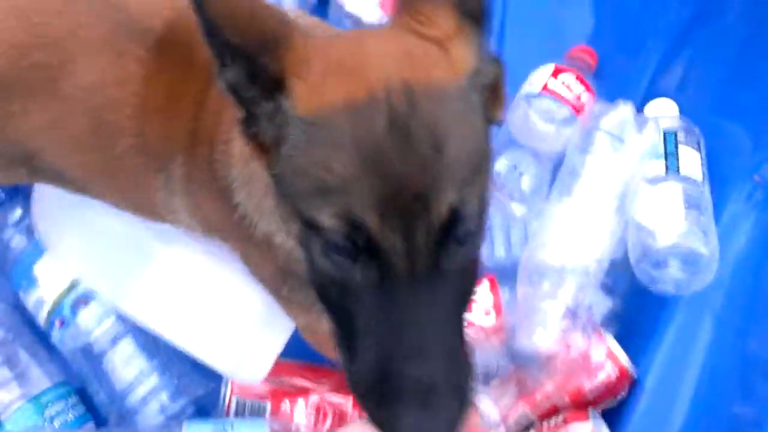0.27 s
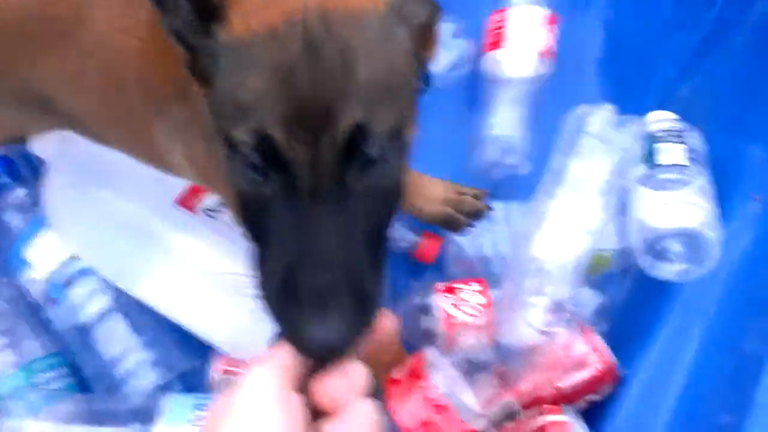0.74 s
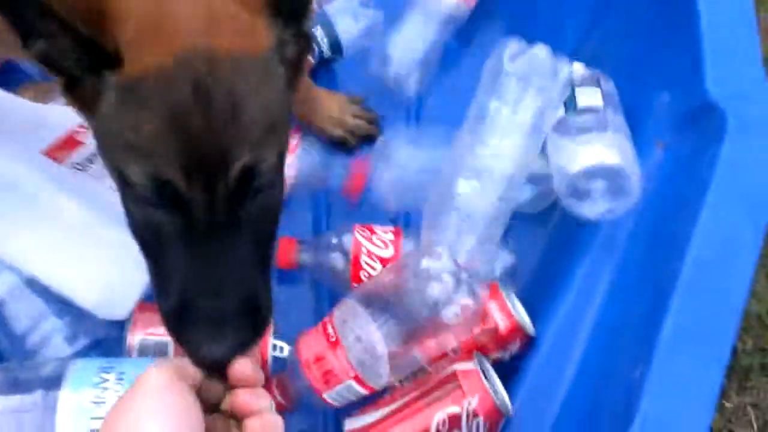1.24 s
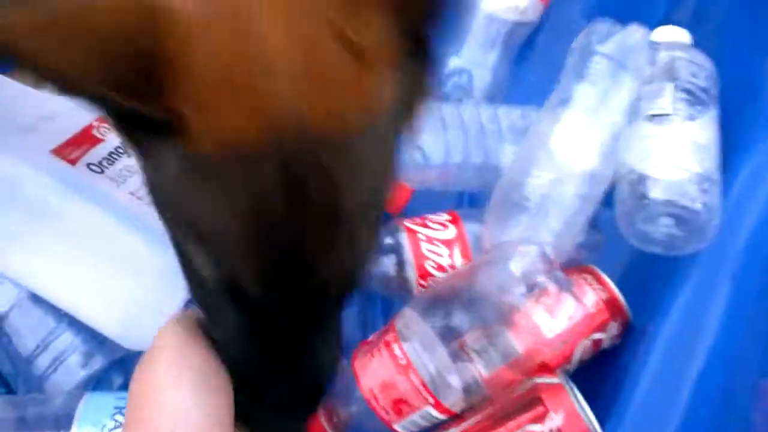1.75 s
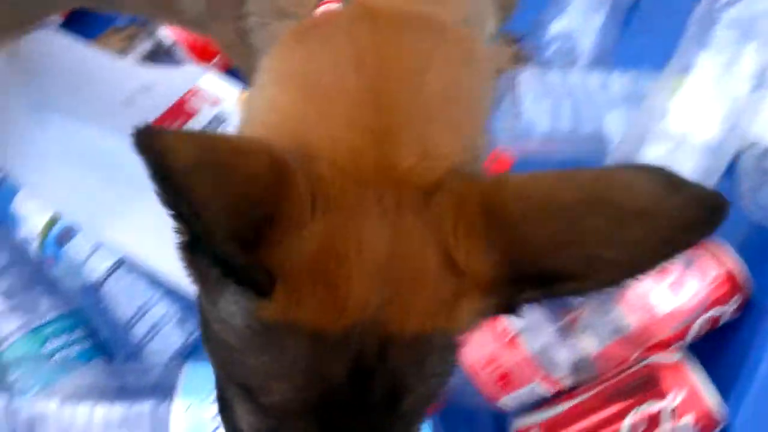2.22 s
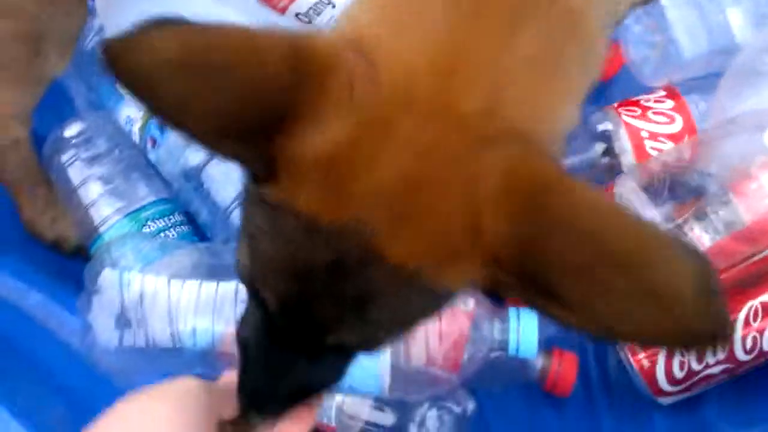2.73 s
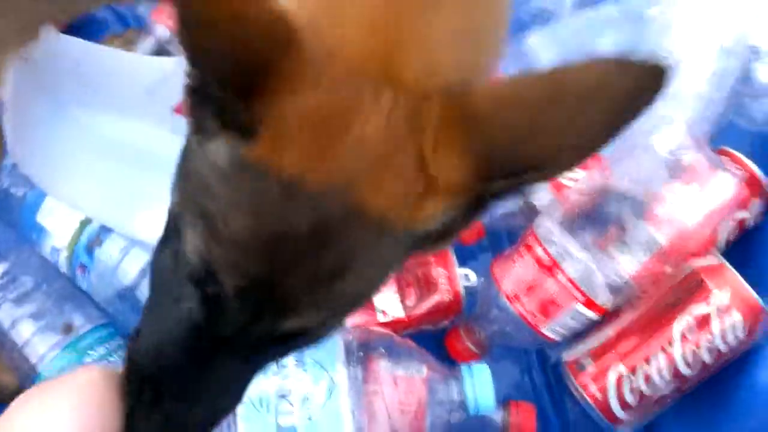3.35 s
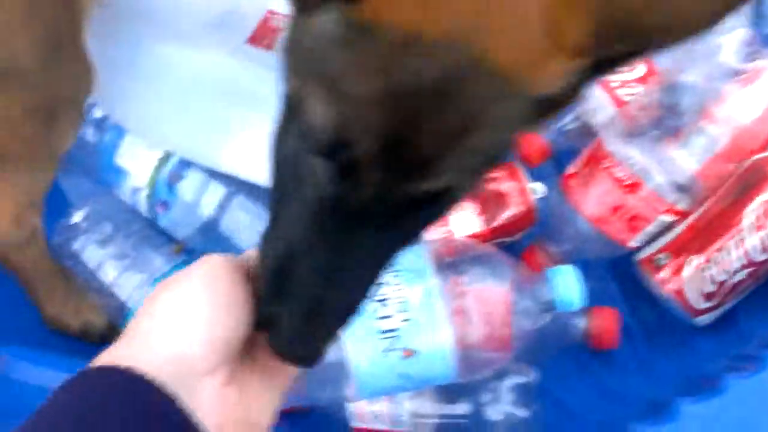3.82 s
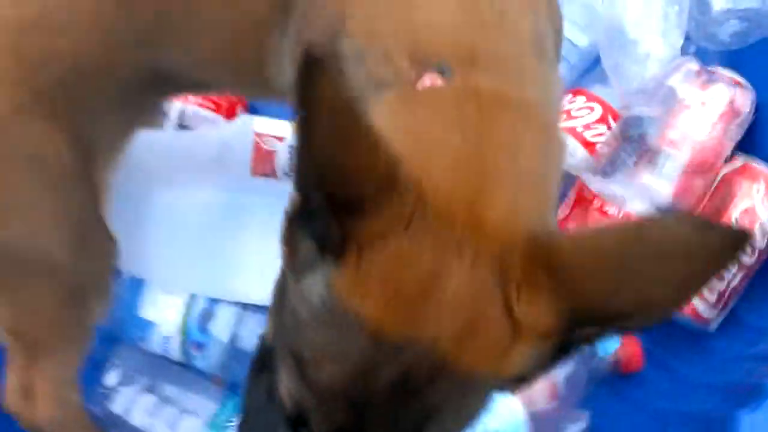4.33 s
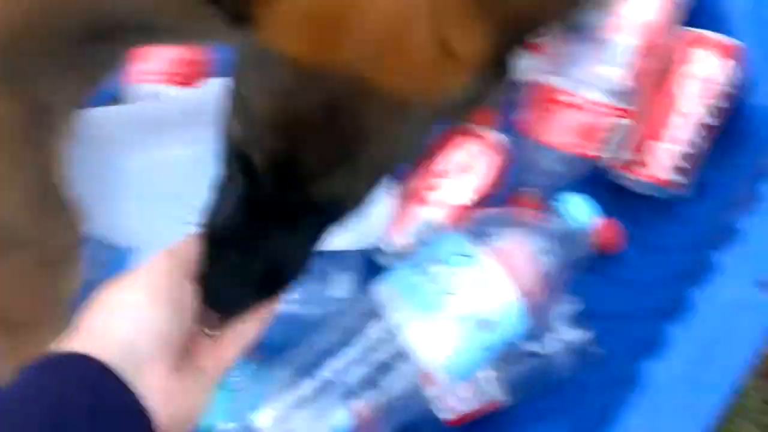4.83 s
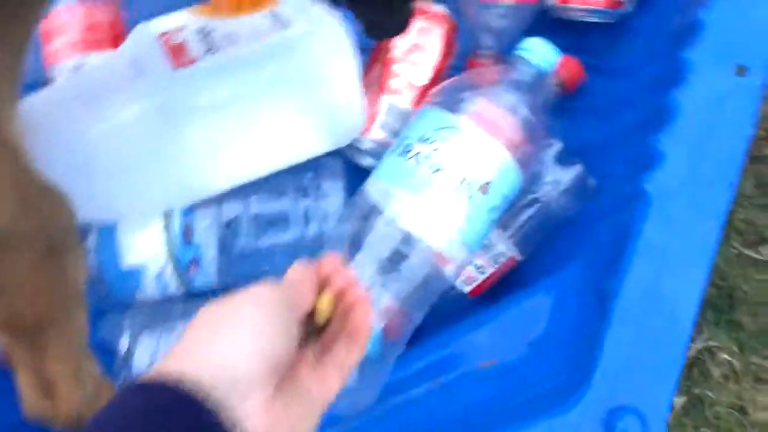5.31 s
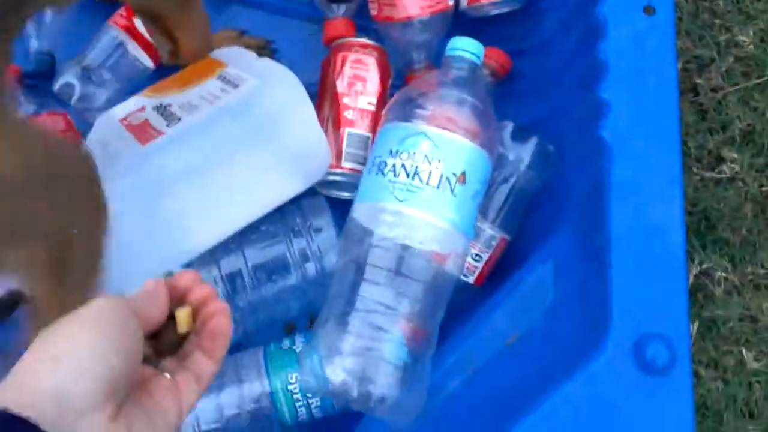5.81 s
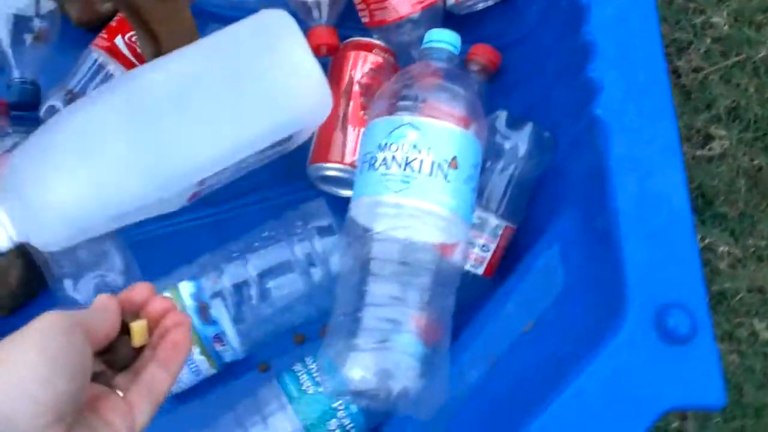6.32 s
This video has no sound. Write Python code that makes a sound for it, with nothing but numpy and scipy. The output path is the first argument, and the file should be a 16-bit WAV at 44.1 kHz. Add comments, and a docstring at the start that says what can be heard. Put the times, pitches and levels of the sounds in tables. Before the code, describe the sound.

A dog rummages through light empty bottles and cans, hollow knocks, tinny clatter and sharp plastic crinkles coming close and dry in uneven flurries.

```python
"""Empty plastic bottles and cans, stirred by a dog's paws and nose in a plastic pool, on a phone close by.
Bottles knock as damped hollow modes, cans tok near 1.2 kHz with a buzz, thin walls crack in noise bursts.
Random contacts through resonances make the sliding heap: low rattle, can chatter, high rustle and crinkle.
Rubs, one squeak, soft brushing and quiet outdoor air lie underneath; short pool reflections widen it all."""
import sys
import numpy as np
from scipy import signal
from scipy.fft import rfft, irfft
from scipy.io import wavfile
from scipy.ndimage import uniform_filter1d, minimum_filter1d

SR = 44100
rng = np.random.default_rng(int(sys.argv[2]) if len(sys.argv) > 2 else 0)


def put_to_file(sound):
    """Save the sound as 16-bit audio at rate SR, in the file named by the first command-line argument."""
    columns = np.atleast_2d(sound).T  # one column per channel
    safe = np.clip(columns, -1, 1)
    whole_steps = np.round(safe * 32767)
    wavfile.write(sys.argv[1], SR, whole_steps.astype(np.int16))


N = 289296  # samples

# Source levels are set ahead of the pool reflections and the microphone.
# Quiet outdoor air, spectral shape: pitch_hz [Hz], relative_db [dB]
AIR_COLOUR = [(12, -32.5), (20, -2), (27, -20), (85, -7.5), (134, -5.5), (153, -8), (487, -16), (1730, -31),
              (9360, -33), (11000, -36)]
AIR_DB = -60.5
# Soft even rustle, probably fur and nose brushing plastic: time_s [s], level_db [dB]
BRUSH_LEVEL = [(0, -53), (.85, -52.5), (1.0, -51.5), (1.07, -70), (1.15, -44), (1.851, -56), (1.949, -69.5),
               (2.63, -87), (2.72, -64.5), (3.05, -48), (3.33, -47.5), (3.9, -54), (4.2, -62), (4.6, -52.5),
               (4.75, -61), (5.3, -66), (5.43, -64), (5.619, -54.5), (5.75, -59.5), (6.101, -63),
               (6.56, -56.5)]
# Resonances of the brushed plastic: pitch_hz [Hz], width_hz [Hz, one filter pass], relative_db [dB]
BRUSH_COLOUR = [(348.4, 510, -2.5), (1200, 750, 2), (4574, 3200, -5), (7000, 4500, 0), (9550, 1400, -7.5)]
SQUEAK_S, SQUEAK_DB, SQUEAK_HALF_S = 5.279, -29, 0.0035  # middle, level, time from middle to 1/e
SQUEAK_HZ, SQUEAK_DROP_HZ, SQUEAK_SETTLE_S = 3750, 900, 0.0039  # resting pitch, fall on to it, its pace
# Rubs that make one resonance sing:
# middle_s [s], level_db [dB], pitch_hz [Hz], width_hz [Hz, one filter pass], half_s [s to 1/e]
RUBS = [(0.008, -22, 940, 81, 0.079), (0.126, -35, 877, 80, 0.076), (0.264, -24.5, 301, 48.7, 0.067),
        (3.879, -39.5, 1188, 99.3, 0.025), (4.015, -42.5, 4540, 1690, 0.021),
        (4.327, -47, 237, 60.5, 0.069), (6.464, -25.5, 219.4, 58.2, 0.024)]
# Shoves of paw or nose that set the heap sliding:
# start_s [s], length_s [s], rattle_db [dB], chatter_db [dB], rustle_db [dB]
SHOVES = [(0, 0.12, -21, -26, -40), (0.135, 0.22, -27.5, -28, -38), (0.396, 0.087, -30.5, -39.5, -49.5),
          (0.506, 0.055, -26, -27.5, -40.5), (0.607, .19, -21.5, -34, -42.5),
          (0.918, 0.069, -30, -36.5, -48), (1.013, 0.01, -27, -64, -59), (1.104, 0.034, -32, -27, -57),
          (1.172, 0.098, -25.5, -29.5, -39.5), (1.301, 0.18, -18.5, -22.5, -34),
          (1.498, 0.15, -19.5, -22.5, -36.5), (1.63, 0.085, -24, -33, -61), (1.749, 0.026, -23, -48, -55),
          (1.849, 0.046, -36.5, -68.5, -61), (2.256, 0.015, -48.5, -60.5, -69.5),
          (2.392, 0.043, -61.5, -79.5, -87.5), (2.707, 0.21, -23.5, -38, -45),
          (2.959, 0.06, -22.5, -37, -43.5), (3.096, 0.03, -28.5, -27.5, -61),
          (3.153, 0.06, -34.5, -33, -45), (3.25, 0.021, -30.5, -25, -45), (3.414, 0.19, -24, -28.5, -41.5),
          (3.648, 0.12, -31.5, -39.5, -47), (3.833, 0.063, -46.5, -47.5, -45.5),
          (4.004, 0.051, -60.5, -57, -47.5), (4.294, 0.063, -46.5, -54, -59.5),
          (4.404, 0.067, -56, -51.5, -62.5), (4.557, 0.045, -53, -59, -56), (4.783, 0.058, -59, -57, -58),
          (4.894, 0.036, -55, -38.5, -52), (4.97, 0.079, -29.5, -30.5, -45), (5.086, 0.19, -26.5, -36, -35),
          (5.352, 0.034, -42, -66, -59.5), (5.44, 0.12, -54, -70, -69), (5.842, 0.059, -29, -34, -42),
          (5.923, 0.021, -21, -56, -56), (6.013, 0.012, -39, -69, -78), (6.17, 0.027, -34, -37, -41.5),
          (6.203, 0.14, -27.5, -31.5, -37), (6.388, 0.099, -30.5, -39.5, -40), (6.542, .03, -27, -50, -39)]
# How a shove swells, runs down while it lasts and dies after; rows are rattle, chatter, rustle:
# rise [dB/s], sag [dB/s], fall [dB/s]
MOTION = [(900, 34, 558.5), (1506, 54, 543), (411.4, 37, 298.5)]
RATTLE, CHATTER, RUSTLE = 0, 1, 2  # rows of MOTION
# Resonances of shaken bottles, cans and thin walls:
# pitch_hz [Hz], width_hz [Hz, one filter pass], relative_db [dB]
HOLLOW = [(210.5, 150, 3), (301, 130, 5.5), (445.3, 394, 0)]
CANS = [(774, 335, 7), (1340, 380, -3.5), (1804, 340, -5.5), (3172, 2700, -19.5)]
WALLS = [(2780, 550, -13), (4470, 2420, 0.5), (5654, 2600, 3), (6990, 3660, 0.5), (10140, 840, -7)]
# Wall cracks: start_s [s], level_db [dB], pitch_hz [Hz, centre], low_db [dB, low part against level]
CRACKS = [(0.032, -30, 6000, -9), (0.124, -21, 6200, -6), (0.3014, -24.5, 6330, -11),
          (0.5094, -21, 5370, -7.5), (0.5487, -20, 6360, -4.5), (0.5886, -29, 3660, 8.5),
          (0.6633, -25.5, 6440, -41), (0.6816, -22.5, 6500, -20), (0.962, -21.5, 5540, 0.5),
          (1.0983, 0, 5080, -11), (1.1403, -17.5, 4200, -10), (1.28, -1, 5490, -8.5),
          (1.2934, -23.5, 6150, -37.5), (1.3068, 4, 6980, -7), (1.353, -21, 4450, -7),
          (1.4154, -19.5, 5250, -20.5), (1.4632, -30.5, 3950, -10.5), (1.493, -22, 5670, -4),
          (1.5524, -18.5, 4850, -5), (1.622, -21.5, 4960, -1), (1.754, -34, 4500, -8),
          (2.6854, -28, 5380, -4), (2.708, -28, 5320, -7), (2.7997, -25, 6170, -14), (2.9219, -26, 6110, 5),
          (2.965, -18.5, 6770, -15), (3.0037, -25, 5470, -29), (3.101, -26.5, 3810, -1.5),
          (3.1443, -20.5, 6120, -15), (3.1588, -22.5, 3940, 6), (3.243, -20.5, 4660, -12),
          (3.3617, -30, 5000, 7), (3.404, -38, 4300, 6), (3.4185, -23.5, 5000, 2), (3.457, -28.5, 4960, 6),
          (3.582, -25.5, 6100, -25), (4.892, -30, 7100, -23), (4.961, -23, 6020, -28),
          (4.9806, -12, 5130, 0), (4.987, -30, 4100, -23), (4.996, -19.5, 5450, -23),
          (5.062, -27.5, 6150, 2), (5.1073, -26.5, 6500, 6), (5.141, -26, 4320, 2),
          (5.683, -32.5, 4840, 2.5), (5.8902, -26.5, 3800, 0), (5.938, -33.5, 4070, -2),
          (6.148, -14, 3930, -3), (6.2612, -24, 5770, 4.5), (6.528, -18, 4270, -8)]
# Can toks: start_s [s], level_db [dB], pitch_hz [Hz]
TOKS = [(0.9613, -15, 1186), (1.0225, -33, 1190), (1.1002, -13, 1466), (1.242, -16, 878),
        (1.2805, -13, 1096), (1.356, -21, 1212), (1.36, -1.5, 1170), (1.372, -29, 1288),
        (1.3918, -30, 1147), (1.4025, -9.5, 1157), (1.416, -2, 1206), (1.4338, -14, 1197),
        (1.465, -0.5, 1178), (2.2548, -33.5, 1188), (2.7303, -11.5, 1246), (2.9648, -25.5, 1340),
        (3.0144, -9, 1178), (3.1049, -6.5, 1230), (3.161, -17, 1028), (3.245, -17, 1245),
        (3.267, -32, 1255), (3.332, -33, 1150), (3.361, -10, 1140), (3.406, -7, 1207), (3.4541, -9.5, 1220),
        (3.511, -13, 1155), (3.5372, -16, 1160), (3.584, -26, 1170), (3.7694, -36, 1170),
        (4.342, -39.5, 1180), (4.407, -41, 1443), (4.924, -28, 1475), (4.961, -26, 970),
        (4.9819, -16, 1007), (5.104, -19.5, 1070), (5.1363, -22, 1280), (5.1716, -17.5, 1170),
        (5.285, -33, 1280), (5.893, -19, 1250),]
CLEAN_TOK_DB = -17  # harder toks ring clear, softer ones mostly buzz
# Bottle knocks: start_s [s], level_db [dB], pitch_hz [Hz], upper_db [dB, clunk against level]
KNOCKS = [(0.094, -17, 447, -8), (0.18, -20.5, 247.8, -17), (0.214, -17, 296.4, -20),
          (0.25, -9.5, 294, -42), (0.315, -19.5, 287, -14), (0.344, -19.5, 303, -20.5),
          (0.417, -20.5, 207.6, -10), (0.508, -20.5, 228.5, -21), (0.51, -15, 510, -24),
          (0.589, -4, 339, -16.5), (0.72, -17.5, 338, -8.5), (0.764, -11, 278.6, -23),
          (0.92, -23.5, 260, -31), (1.022, -18.5, 266.6, -4), (1.096, -17, 653, 0),
          (1.175, -16.5, 301, -0.5), (1.232, -20.5, 191.1, -12), (1.303, -12.5, 447.5, -21),
          (1.312, -1, 336.4, -9), (1.361, -9, 323.3, -23), (1.499, -16, 303, -19), (1.625, -16, 723, -34),
          (1.678, -21, 244.4, -17), (1.733, -15, 465.5, -19), (1.753, -18.5, 732, -13),
          (1.828, -28, 361, -16), (1.861, -24.5, 281.8, -32), (2.651, -36.5, 446, -22),
          (2.685, -15.5, 810, -14.5), (2.721, -30, 302, -28), (2.76, -22, 242, -1),
          (2.917, -8, 333.5, -7.5), (2.982, -14.5, 350, -11), (3.074, -17.5, 267.4, -11.5),
          (3.198, -14.5, 266, -15), (3.245, -23, 716, -13), (3.38, -17.5, 221, -5.5),
          (3.4175, -12, 293, -6), (3.49, -18.5, 760, -8), (3.564, -21.5, 169.8, -9),
          (3.648, -17.5, 261, -15), (3.705, -24, 353, -18.5), (5.062, -14, 268, -6),
          (5.097, -9.5, 391, -16.5), (5.106, -29.5, 364, -16), (5.148, -15, 356, -16),
          (5.175, -14.5, 275.5, -30), (5.24, -20, 350, -12), (5.683, -17, 349, -9), (5.856, -26.5, 298, -6),
          (5.891, -16, 280, -11.5), (5.9369, -20.5, 343, 0.5), (5.97, -21.5, 294, -27),
          (6.0144, -34, 298, 6.5), (6.213, -18, 790, -5.5), (6.223, -16.5, 281, -6.5),
          (6.278, -16.5, 375, -8.5), (6.308, -22, 687, -11), (6.333, -27.5, 396, -15),
          (6.394, -20.5, 199, -31), (6.406, -26, 720, -2.5), (6.44, -15, 416, -23),
          (6.529, -9.5, 268, -23.5)]
# Ringing modes of a bottle: ratio [multiple of pitch_hz], relative_db [dB], t60_s [s, for a 300 Hz bottle]
BOTTLE_MODES = [(1, -2, 0.046), (1.4, -13, 0.057), (.7, -21, 0.1)]
# Upper resonances in the clunk: pitch_hz [Hz], width_hz [Hz, one filter pass], relative_db [dB]
BOTTLE_UPPER = [(743, 440, 10.5), (1273, 560, 1.5), (2022, 110, -11.5)]
# Likeness of the two microphone ports: pitch_hz [Hz], correlation [0 to 1]
LIKENESS = [(30, 0.35), (150, 1), (1000, 0.88), (2500, 0.39), (9000, 0.54)]
# Lean to the left port: pitch_hz [Hz], share [ratio, negative leans right]
LEFT_LEAN = [(1000, 0.045), (2500, -0.12), (5000, 0.25)]
MIC_DB, LIMIT, TOP_HZ = -1.88, 0.98, 10700  # gain, peak ceiling ahead of the top cut, top cut


def undb(db):
    """Decibels to an amplitude factor."""
    return 10 ** (np.asarray(db) / 20)


def unit(x):
    """Scale to an RMS of 1."""
    return x / np.sqrt(np.mean(x ** 2))


def by_hz(table, hz):
    """Read a (pitch_hz, value) table on a log-frequency axis."""
    pitch_hz, value = np.transpose(table)
    return np.interp(np.log(hz + 1), np.log(pitch_hz), value)


def band(x, hz, width_hz):
    """A resonance applied twice."""
    b, a = signal.iirpeak(min(hz, 0.45 * SR), hz / width_hz, fs=SR)
    once = signal.lfilter(b, a, x)
    return signal.lfilter(b, a, once)


def body(x, peaks):
    """Resonances of a body driven by x, in alternating polarity."""
    total = 0
    for k, (hz, width_hz, db) in enumerate(peaks):
        total = total + (-1) ** k * undb(db) * band(x, hz, width_hz)
    return unit(total)


def ring(hz, t60_s, rise_s):
    """One damped mode, pushed up over the contact time; peak 1."""
    t = np.arange(int(0.09 * SR)) / SR
    mode = np.sin(2 * np.pi * hz * t) * (1 - np.exp(-t / rise_s)) * undb(-60 * t / t60_s)
    return mode / np.abs(mode).max()


def add(track, start_s, sound):
    """Mix a short sound in at its start time."""
    i = int(start_s * SR)
    track[i:i + len(sound)] += sound[:N - i]


def contacts(rate_hz, scatter_db, rub, soft_s):
    """Random small contacts of uneven size, each a short scrape, over a steady rub."""
    hits = (rng.random(N) < rate_hz / SR) * undb(scatter_db * rng.standard_normal(N))
    keep = np.exp(-1 / (soft_s * SR))
    scrapes = unit(signal.lfilter([1], [1, -keep], hits))
    return unit((scrapes + rub) * rng.standard_normal(N))


def air():
    """Quiet outdoor background: steady noise shaped by its spectrum."""
    hz = np.fft.rfftfreq(N, 1 / SR)
    spectrum = rfft(rng.standard_normal(N)) * undb(by_hz(AIR_COLOUR, hz))
    return undb(AIR_DB) * unit(irfft(spectrum, N))


def brushing():
    """Fine friction noise with a few faint ticks in it."""
    level_db = np.interp(np.arange(N) / SR, *np.transpose(BRUSH_LEVEL))
    return undb(level_db) * body(contacts(60.0, 4.0, 1.5, 0.004), BRUSH_COLOUR)


def squeak():
    """Two walls slip past each other with a short falling chirp."""
    t = np.arange(N) / SR - SQUEAK_S
    since_onset = np.maximum(t + SQUEAK_HALF_S, 0)
    hz = SQUEAK_HZ + SQUEAK_DROP_HZ * np.exp(-since_onset / SQUEAK_SETTLE_S)
    swell = np.exp(-(t / SQUEAK_HALF_S) ** 2)
    return undb(SQUEAK_DB) * swell * np.sin(2 * np.pi * np.cumsum(hz) / SR)


def rubs():
    """Friction noise through one narrow resonance, swelling and fading."""
    out, t = np.zeros(N), np.arange(N) / SR
    noise = rng.standard_normal(N)
    for middle_s, db, hz, width_hz, half_s in RUBS:
        swell = np.exp(-((t - middle_s) / half_s) ** 2)
        out += undb(db) * swell * unit(band(noise, hz, width_hz))
    return out


def shaking(layer):
    """How hard one kind of body is shaken: the powers of all shoves add."""
    t = np.arange(0, N, 32) / SR  # a coarse time grid is enough
    rise, sag, fall = MOTION[layer]
    power = 0
    for start_s, length_s, *db in SHOVES:
        before = rise * np.maximum(start_s - t, 0)
        during = sag * np.clip(t - start_s, 0, length_s)
        after = fall * np.maximum(t - start_s - length_s, 0)
        power = power + undb(db[layer] - (before + during + after)) ** 2
    return np.interp(np.arange(N) / SR, t, np.sqrt(power))


def crinkle():
    """Small wall panels of many sizes, each popping now and then on its own pitch."""
    total = 0
    for hz in 3600.0 * 2.3 ** rng.random(12):
        total = total + unit(band(contacts(40.0, 3.0, 0.2, 0.0044), hz, hz / 12.0))
    return unit(total)


def sliding():
    """The moving heap: three kinds of body, partly shaken by the same bumps; the thin walls also crinkle."""
    bumps = contacts(200.0, 1.8, 0.27, 0.0061)
    can_bumps = 0.37 * bumps + contacts(320.0, 2.7, 0.081, 0.0033)
    wall_bumps = 0.35 * bumps + contacts(160.0, 1.1, 0.98, 0.0037)
    rattle = shaking(RATTLE) * body(bumps, HOLLOW)
    chatter = shaking(CHATTER) * body(can_bumps, CANS)
    rustle = shaking(RUSTLE) * (body(wall_bumps, WALLS) + undb(-4.5) * crinkle())
    return rattle + chatter + rustle


def cracks():
    """A buckling wall: a burst of a few ms around its centre, a fainter tail, and a few panels that ping."""
    out, t = np.zeros(N), np.arange(int(0.09 * SR)) / SR
    burst, tail = undb(-60 * t / 0.035), undb(-21.5 - 60 * t / 0.081)
    shape = (1 - np.exp(-t / 0.0003)) * (burst + tail)
    for start_s, db, hz, low_db in CRACKS:
        noise = rng.standard_normal(len(t))
        bright = undb(-4.5) * unit(band(noise, hz, 900.0)) + body(noise, WALLS)
        low = undb(low_db) * unit(band(noise, 2600.0, 4200.0))
        pings = ring(hz, 0.056, 0.0004)
        for detune in 0.22 * np.tanh(rng.standard_normal(3)):
            pings = pings + ring(hz * np.exp(detune), 0.05, 0.00026)
        add(out, start_s, undb(db - 8) * (shape * (bright + low) + undb(-7.5) * pings))
    return out


def toks():
    """A can wall swells up over about 3 ms with a quick overtone; a rough buzz near its pitch starts with it."""
    out, t = np.zeros(N), np.arange(int(0.09 * SR)) / SR
    swell = np.exp(-((t - 0.003) / np.where(t < 0.003, 0.0018, 0.004)) ** 2)  # peaks 3 ms in
    buzz_shape = undb(-1.5 - 60 * t / 0.066) * (1 - np.exp(-t / 0.0007))
    for start_s, db, hz in TOKS:
        clear = 1 / (1 + undb(CLEAN_TOK_DB - db))
        buzz = buzz_shape * unit(band(rng.standard_normal(len(t)), hz, 260.0))
        overtone = undb(-21.0) * ring(1.6 * hz, 0.03, 0.0012)
        tone = swell * np.sin(2 * np.pi * hz * t) + overtone
        add(out, start_s, undb(db) * (clear * tone + (1.2 - clear) * buzz))
    return out


def knocks():
    """Each bottle rings at its own pitch, mode shares vary slightly, and a sharp, noisy clunk starts it."""
    out, t = np.zeros(N), np.arange(int(0.08 * SR)) / SR
    shape = (1 - np.exp(-t / 0.00069)) * undb(-60 * t / 0.06)
    blow = body(np.exp(-((t - 0.002) / 0.0001) ** 2), BOTTLE_UPPER)  # one very short push
    for start_s, db, hz, upper_db in KNOCKS:
        stretch = (300 / hz) ** 0.68  # lower bottles ring longer
        for ratio, mode_db, t60_s in BOTTLE_MODES:
            vary_db = 0.15 * rng.standard_normal()
            add(out, start_s, undb(db + mode_db + vary_db) * ring(hz * ratio, t60_s * stretch, 0.0013))
        clunk = shape * body(rng.standard_normal(len(t)), BOTTLE_UPPER) + undb(-13.5) * blow
        add(out, start_s, undb(db + upper_db) * clunk)
    return out


def pool(x):
    """Short dense reflections off the pool sides, different at the two microphone ports."""
    t = np.arange(int(0.1 * SR)) / SR
    echo = rng.standard_normal(len(t)) * undb(-60 * t / 0.08)
    hz = np.fft.rfftfreq(N, 1 / SR)
    # even out the broad colour of the reflections, keeping their timing
    spread = rfft(echo, N)
    spread = spread / np.sqrt(uniform_filter1d(np.abs(spread) ** 2, size=1500))
    like = np.clip(by_hz(LIKENESS, hz), 0, 0.999)
    width = np.sqrt((1 - like) / (1 + like))
    lean = np.tanh(by_hz(LEFT_LEAN, hz))
    side = irfft(rfft(x) * (spread * width + lean), N)
    return np.array([x + side, x - side])


def scene():
    """Every kind of source lies elsewhere in the pool and gets its own reflections."""
    sources = (air, brushing, squeak, rubs, sliding, cracks, toks, knocks)
    return sum(pool(source()) for source in sources)


def record(dry):
    """The phone thins the bass, turns the gain down just around the loudest peaks and cuts the top."""
    high_pass = signal.butter(4, 105.0, "high", fs=SR, output="sos")
    thin = undb(MIC_DB) * (signal.sosfilt(high_pass, dry) + undb(-13.5) * dry)  # some bass leaks through
    need = LIMIT / np.maximum(np.abs(thin).max(axis=0), LIMIT)
    gain = uniform_filter1d(minimum_filter1d(need, size=161), size=161)
    top_cut = signal.ellip(8, 0.2, 60, TOP_HZ, fs=SR, output="sos")
    return signal.sosfilt(top_cut, gain * thin)


dry = scene()
out = record(dry)
put_to_file(out)
```